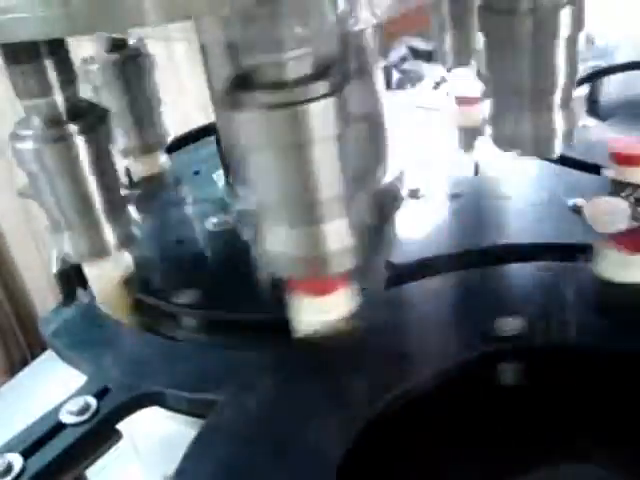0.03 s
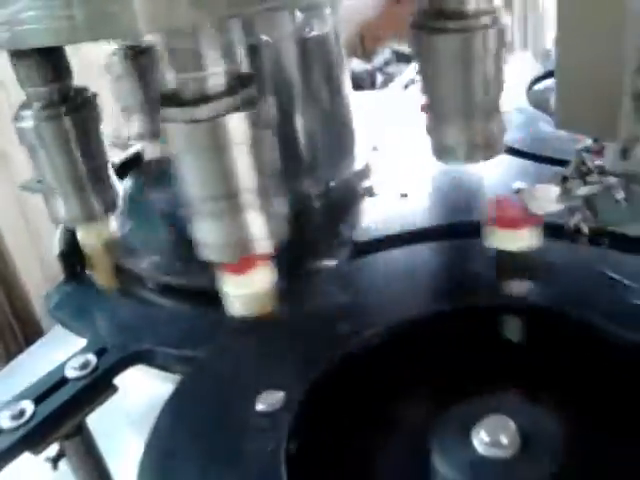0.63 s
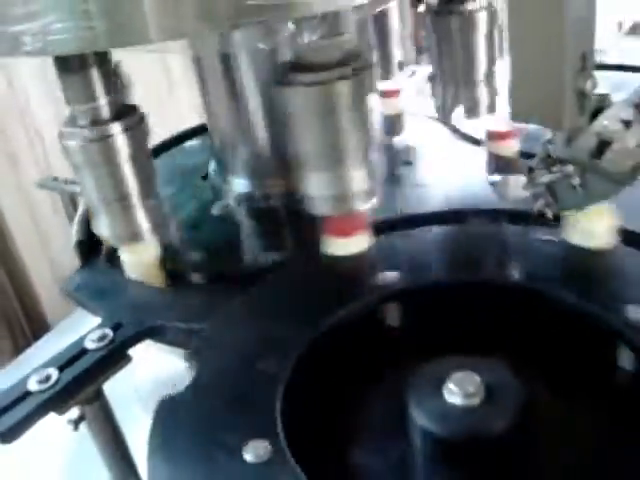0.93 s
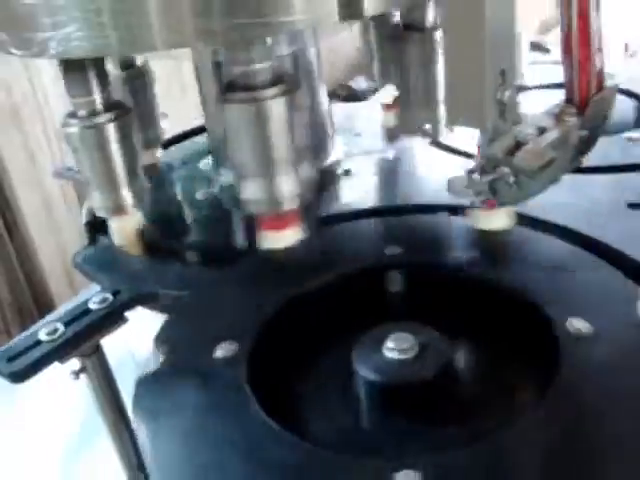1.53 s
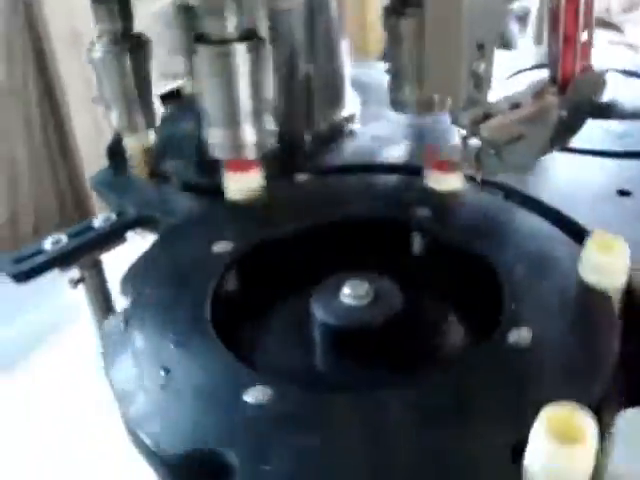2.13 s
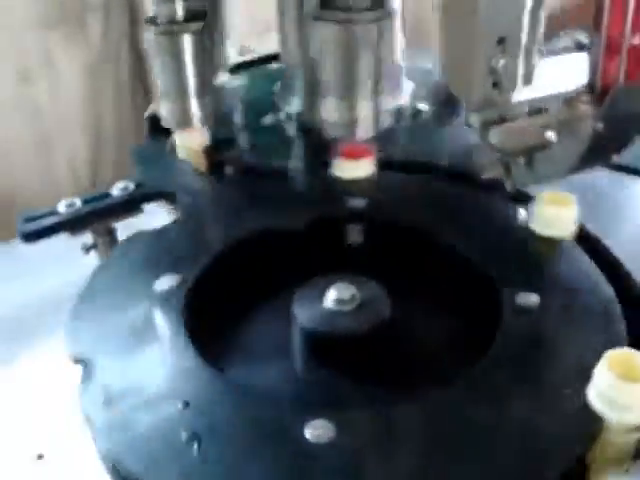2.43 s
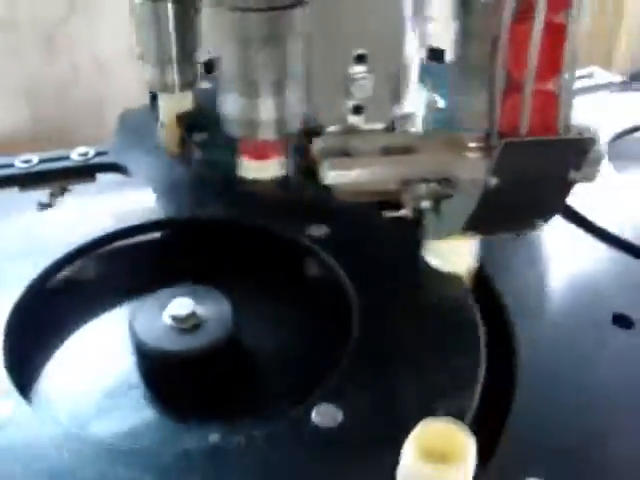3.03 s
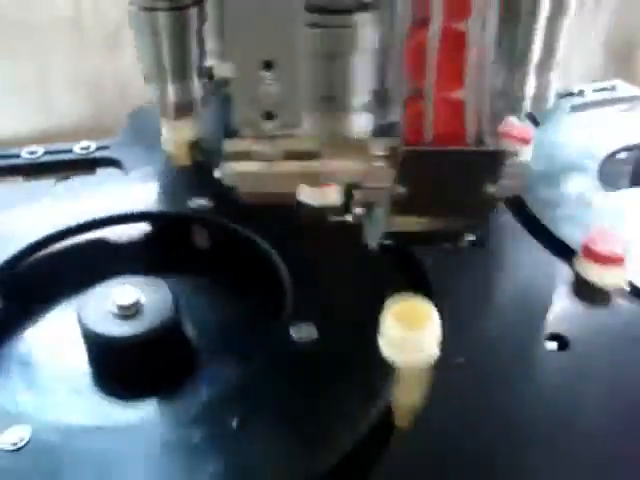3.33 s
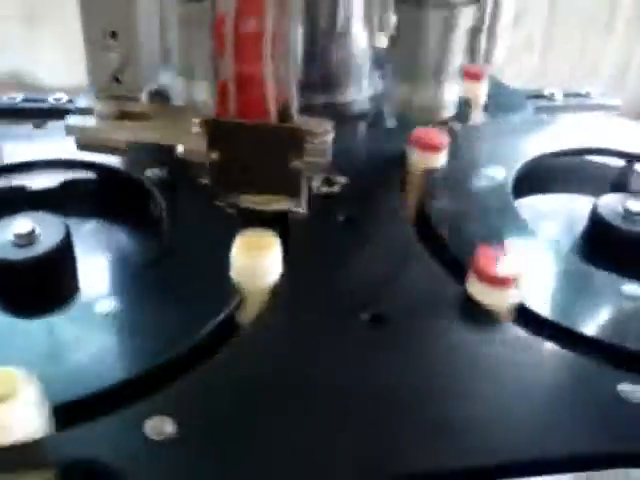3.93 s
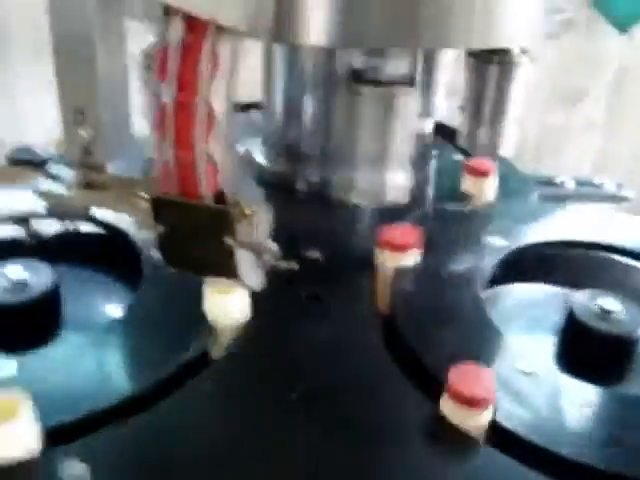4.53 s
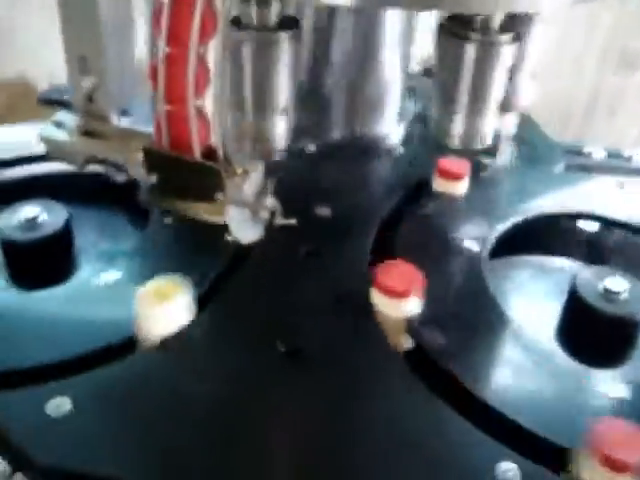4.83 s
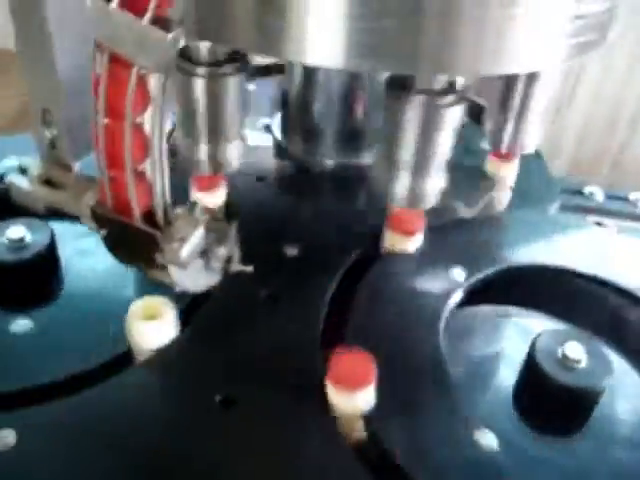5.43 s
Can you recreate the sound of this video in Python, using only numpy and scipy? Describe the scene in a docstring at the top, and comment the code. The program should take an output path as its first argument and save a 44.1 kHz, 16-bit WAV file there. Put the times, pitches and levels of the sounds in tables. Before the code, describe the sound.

A loud capping machine rattles and grinds steadily, pulsing with sharp, whistling air blasts twice a second and occasional steel clacks.

```python
"""An air valve blasts twice a second on a rotary capping machine: a turbulent jet that whistles in its nozzle.
Before each blast a head bears down and its chuck scrapes on a cap by stick-slip friction. Air spits,
bottles knock and steel clacks and squeals in between. Behind it all, caps rattle in a mains-driven feeder,
gears and star wheels grind and a motor hums. The gain control of a close mono camera ducks under every
blast and creeps back, so the whole din pulses."""
import sys
import numpy as np
from scipy import signal
from scipy.fft import rfft, irfft, next_fast_len
from scipy.io import wavfile
from scipy.ndimage import uniform_filter1d, map_coordinates

SR = 44100
rng = np.random.default_rng(int(sys.argv[2]) if len(sys.argv) > 2 else 0)


def persist_wave(psi):
    """Save psi, clipped to +-1, as 16-bit WAV."""
    counts = np.round(np.clip(psi, -1, 1) * 32767).astype(np.int16)
    wavfile.write(sys.argv[1], SR, np.atleast_2d(counts).T)


N = 250047

# one machine cycle a bottle, ended by its air blast: (time [s], hiss [dB], time held open [s],
# nozzle whistle [dB], opening crack [dB], scrape on the cap [dB], gear level in the next cycle [dB])
CYCLES = [(0.137, -15, 0.018, -19.5, -16, -23, -0.5), (0.647, -16, 0.032, -22, -20, -21.5, -0.9),
          (1.159, -13.5, 0.013, -20, -16.5, -21, -1), (1.665, -17.5, 0.039, -19, -17, -38, -0.5),
          (2.177, -14, .016, -25, -13.5, -28, -0.4), (2.691, -15, 0.02, -18.5, -14, -23, -0.9),
          (3.198, -18, .025, -21.5, -16.5, -24, -0.2), (3.718, -9.5, 0.016, -17, -10.5, -25, -1.5),
          (4.226, -10, 0.012, -25, -14.5, -31, -0.4), (4.733, -11, 0.023, -23, -14.5, -34, -0.1),
          (5.245, -15, 0.025, -22, -21, -24, -1)]
# steel clacks of the capping heads: (time [s], level [dB], shrill edge [dB])
CLACKS = [(.57, -17, -22), (1.11, -17, -22), (1.127, -12, -9), (1.618, -18, -22), (1.802, -16, -22),
          (2.145, -18.5, -21), (2.638, -10, 1), (3.925, -15.5, -20), (4.15, -12.5, -10),
          (5.171, -16.5, -22), (5.559, -13.5, -14)]
# spectrum of the shrill edge of blasts and clacks: (frequency [Hz], relative level [dB])
SHRILL_SPECTRUM = [(9000, -48), (11500, -5.5), (17000, 16), (21000, -20)]
# spectrum of the nozzle's resonance: (frequency [Hz], relative level [dB])
NOZZLE_SPECTRUM = [(4200, -42), (4800, -3.5), (5050, 2.5), (5300, -9), (5900, -40.5)]
CYCLE_S, FIRST_BLAST_S = 0.511, CYCLES[0][0]


def amp(db):
    """Amplitude ratio of a level in decibels."""
    return 10 ** (np.asarray(db) / 20)


def unit(x):
    """x scaled to rms 1."""
    return x / np.sqrt(np.mean(x ** 2) + 1e-20)


def clock():
    """The time of each sample in seconds."""
    return np.arange(N) / SR


def wobble(rate):
    """A smooth random curve, rate knots a second."""
    return map_coordinates(rng.standard_normal(int(N * rate / SR) + 4), [np.arange(N) * rate / SR])


def filtered(x, response):
    """Linear filtering: the spectrum of x times a frequency response."""
    size = next_fast_len(N + SR // 2)
    return irfft(rfft(x, size) * response(np.fft.rfftfreq(size, 1 / SR)), size)[:N]


def coloured(x, spectrum):
    """x shaped by (frequency [Hz], level [dB]) points on a log axis, at rms 1."""
    points_hz, db = np.transpose(spectrum)
    return unit(filtered(x, lambda hz: amp(np.interp(np.log(hz + 1), np.log(points_hz), db))))


def noise(spectrum):
    """Coloured Gaussian noise at rms 1."""
    return coloured(rng.standard_normal(N), spectrum)


def patchy(x, depth_db, size=4096):
    """Random modulation in patches of time and frequency, as parts turn."""
    bins = signal.stft(x, nperseg=size)[2]
    field = uniform_filter1d(rng.standard_normal(bins.shape), size=4, axis=0)
    field = uniform_filter1d(field, size=5, axis=1)
    return signal.istft(bins * amp(depth_db * unit(field)), nperseg=size)[1][:N]


def contacts(rate, spread_db):
    """Shot noise: random tiny impacts of uneven size, rate a second, at rms 1."""
    impulses = (rng.random(N) < rate / SR) * rng.choice([-1, 1], N)
    return unit(impulses * amp(spread_db * rng.standard_normal(N)))


def burst(start, attack, hold, t60):
    """An envelope that rises, holds and decays exponentially; times in seconds."""
    age = np.maximum(clock() - start, 0)
    return (1 - np.exp(-age / attack)) * amp(-60 * np.clip((age - hold) / t60, 0, 2))


def pressing(lead_s=0.25):
    """The load of a head on its cap, 0 to 1: it builds up before each blast and lets go."""
    to_blast = (FIRST_BLAST_S - clock()) % CYCLE_S
    return uniform_filter1d(np.clip(2 * (1 - to_blast / lead_s), 0, 1), size=441)


def motor():
    """Mains hum: harmonics of the supply waver slightly in level and phase."""
    # hum partials: (frequency [Hz], peak level [dB])
    partials = [(149.7, -59.5), (199.6, -51.5), (349.4, -44), (499.2, -41)]
    return sum(amp(db + 0.92 * wobble(4)) * np.sin(2 * np.pi * hz * clock() + 0.5 * wobble(2.89))
               for hz, db in partials)


def gears():
    """Contact noise: gears and star wheels grind over a faint, lumpy rumble, louder under load."""
    # spectra of the grinding and the rumble: (frequency [Hz], relative level [dB])
    grind_spectrum = [(70, -39.5), (160, -18), (205, -5.5), (310, -5), (540, 1.5), (850, 3), (1400, 0.5),
                      (2200, -2.5), (5000, -31)]
    rumble_spectrum = [(20, -8), (50, -9.5), (100, 4.5), (160, 1.5), (300, -30)]
    teeth = patchy(contacts(rate=1400, spread_db=3.5) + rng.standard_normal(N), depth_db=1.9)
    rumble = amp(-39 + 4 * wobble(14)) * noise(rumble_spectrum)
    grind = amp(0.52 * wobble(14)) * coloured(teeth, grind_spectrum)
    drag_db = sum(db * ((clock() > s) & (clock() <= s + CYCLE_S)) for s, *_, db in CYCLES)
    return amp(-24.5 + drag_db + 1.17 * pressing()) * (grind + rumble)


def feeder(mains_hz=49.9, shake_db=1.5, settle_s=0.16):
    """Forced vibration: caps thrown up once per mains cycle chatter and excite the steel chute's modes."""
    # spectrum of the chatter: (frequency [Hz], relative level [dB])
    rattle_spectrum = [(100, -53.5), (300, -31.5), (1000, -6), (1500, -6), (1800, 0.5), (2250, -0.5),
                       (3150, 0.5), (3500, -1), (4700, -2.5), (6000, -8), (7400, -12), (8400, -17),
                       (9300, -16), (10000, -30)]
    # resonances of the steel: (frequency [Hz], bandwidth [Hz], relative level [dB])
    modes = [(1784, 136, -2), (2643, 160, 3.5), (2800, 170, 4), (4700, 100, -30.5)]
    # the camera drifts towards the chute and past it:
    # (time [s], change of the rattle [dB], ringing relative to the rattle [dB])
    nearness = [(0, -0.6, -7), (.7, -0.9, -7.5), (1.4, -1.8, -6.5), (2.2, -0.34, -7), (3.15, 0, -5.5),
                (3.9, 0.4, -5.5), (4.45, -0.5, -3.5), (5.1, -0.3, -5), (5.67, 0.4, -7.5)]

    def steel(hz):
        """Frequency response of damped resonators in parallel."""
        return sum(amp(db) * 1j * hz * width / (centre ** 2 - hz ** 2 + 1j * hz * width)
                   for centre, width, db in modes)

    phase = 2 * np.pi * mains_hz * clock()
    throw = amp(0.9 * np.sin(phase) + 0.5 * np.sin(2 * phase))  # the second harmonic is the rebound
    impacts = throw * contacts(rate=4000, spread_db=3.1)
    hall_wash = 0.87 * rng.standard_normal(N)
    chatter = coloured(patchy(impacts + hall_wash, depth_db=1.92), rattle_spectrum)
    ring = filtered(throw * contacts(rate=3000, spread_db=2.5), steel)
    ring = unit(patchy(ring, depth_db=0.8))
    times, near_db, chute_db = np.transpose(nearness)
    since_blast = (clock() - FIRST_BLAST_S) % CYCLE_S
    stir_db = shake_db * np.exp(-since_blast / settle_s)  # each blast stirs the caps
    level_db = -18 + np.interp(clock(), times, near_db) + stir_db
    ring_db = np.interp(clock(), times, chute_db) + pressing()  # a pressing head shakes the chute
    return amp(level_db) * (chatter + amp(ring_db) * ring)


def thuds(transfer_db=-37):
    """Reaction force: the heavy frame takes a push from every blast and clack, and hardly rings."""
    push = sum(amp(db + transfer_db) * burst(s - 0.004, attack=0.002, hold=0.0067, t60=0.06)
               for s, db, *_ in [*CYCLES, *CLACKS])
    return push * noise([(20, -4), (60, -2), (130, 5), (250, -8), (800, -51)])


def squeals():
    """Friction-excited vibration: rubbing steel sings for a moment on one wavering mode."""
    # thin squeals: (time [s], relative level [dB], duration [s], frequency [Hz])
    rubs = [(0.563, -25, .03, 4600), (.72, -35, 0.071, 4580), (4.422, -24, 0.11, 2885),
            (4.62, -35, .1, 2700), (5.305, -21, .025, 4640)]
    out = np.zeros(N)
    for s, db, length, hz in rubs:
        tone = np.sin(2 * np.pi * hz * clock() + 0.64 * wobble(76))
        out += amp(db + 2.5) * burst(s, attack=0.02, hold=length, t60=0.15) * tone
    return out


def knocks():
    """Modal ringing: a plastic bottle knocked in the star wheels sounds three close, damped modes."""
    # hollow knocks: (time [s], level of each mode [dB], pitch [Hz])
    blows = [(0.94, -22, 900), (1.462, -19, 846), (1.968, -18.5, 790), (2.977, -15, 1188),
             (3.488, -19, 1094), (3.777, -20, 802), (4.007, -20, 1150), (5.018, -20, 1008),
             (5.176, -17, 820)]
    out = np.zeros(N)
    for s, db, hz in blows:
        ring = sum(np.sin(2 * np.pi * (hz * ratio * clock() + rng.random())) for ratio in (0.8, 1, 1.22))
        out += amp(db) * burst(s, attack=0.00068, hold=0.0034, t60=0.043) * ring
    return filtered(out, lambda hz: hz ** 2 / (hz ** 2 + 300 ** 2))  # too small to radiate bass


def clacks():
    """Damped impact: steel parts of a head collide in a broadband burst with a shrill edge."""
    # spectrum of the impact: (frequency [Hz], relative level [dB])
    body_spectrum = [(150, -38), (600, -6), (1800, 4.5), (3000, 4.5), (4200, 2.5), (5200, -7), (7000, -3.5),
                     (10000, -9.5)]
    body = sum(amp(db) * burst(s, attack=0.00066, hold=0.0033, t60=0.047) for s, db, _ in CLACKS)
    edge = sum(amp(db) * burst(s + 0.003, attack=0.001, hold=0.004, t60=0.04) for s, _, db in CLACKS)
    return body * noise(body_spectrum) + edge * noise(SHRILL_SPECTRUM)


def scrapes(lead_s=0.13):
    """Stick-slip friction: before each blast the spinning chuck slips on the cap in tiny catches."""
    # spectrum of the scrape: (frequency [Hz], relative level [dB])
    scrape_spectrum = [(1200, -29), (2600, -8.5), (3000, 7.5), (3350, -2), (3900, -1.5), (4700, -6),
                       (8000, -23)]
    pressure = sum(amp(db) * burst(s - lead_s, attack=0.034, hold=0.11, t60=0.071)
                   for s, *_, db, _ in CYCLES)
    return pressure * coloured(contacts(rate=5000, spread_db=3), scrape_spectrum)


def spits():
    """Flow-excited tones: air escapes briefly through a narrow gap, two rough whistles over a hiss."""
    # spits of air: (time [s], relative level [dB], whistle frequency [Hz], relative nozzle level [dB])
    escapes = [(0.111, -29, 9200, -29), (0.272, -21, 9100, -39), (.423, -31, 9250, -34),
               (0.777, -27.5, 9200, -22), (1.305, -28, 9100, -19), (2.322, -29.5, 9360, -20.5),
               (2.643, -19.5, 9370, -20), (3.339, -30.5, 9400, -33), (3.779, -26, 9000, -32),
               (3.842, -23, 9300, -21), (3.998, -30, 9100, -24), (4.366, -23.5, 9170, -20),
               (4.856, -29.5, 9200, -22), (5.311, -26.5, 9150, -30)]
    # spectrum of their hiss: (frequency [Hz], relative level [dB])
    hiss_spectrum = [(1500, -20.5), (4000, -15), (6000, 3), (8000, -3), (10000, -8)]
    out, hiss, nozzle = np.zeros(N), noise(hiss_spectrum), noise(NOZZLE_SPECTRUM)
    for s, db, hz, nozzle_db in escapes:
        whistle = np.sin(2 * np.pi * hz * clock() + 1.5 * wobble(550))
        air = amp(db) * (amp(3) * whistle + amp(0.5) * hiss) + amp(nozzle_db - 0.5) * nozzle
        out += burst(s, attack=0.0004, hold=0.013, t60=0.013) * air
    return out


def plunger(lag_s=0.019):
    """Impact transient: the valve's plunger hits its stop with a dry click just after each opening."""
    # spectrum of the click: (frequency [Hz], relative level [dB])
    click_spectrum = [(900, -33), (1600, -3), (2050, 3), (2500, -4.5), (3500, -23)]
    landings = sum(burst(s + lag_s, attack=0.001, hold=0.004, t60=0.02) for s, *_ in CYCLES)
    return amp(-17) * landings * noise(click_spectrum)


def valve():
    """Turbulent jet noise: each blast cracks open at full pressure, then hisses and whistles."""
    # spectrum of the jet: (frequency [Hz], relative level [dB])
    jet_spectrum = [(800, -33), (2100, 2.5), (3500, 2.5), (4400, 3.5), (4700, 0), (5650, 3.5), (6250, 2),
                    (6700, -2), (8800, -5), (9800, -5.5)]
    flow, whistle, crack = np.zeros((3, N))
    for s, hiss_db, hold, whistle_db, crack_db, *_ in CYCLES:
        flow += amp(hiss_db) * burst(s, attack=0.0018, hold=hold, t60=0.26)
        whistle += amp(whistle_db) * burst(s, attack=0.001, hold=hold, t60=0.32)
        crack += amp(crack_db) * burst(s, attack=0.00032, hold=0.0025, t60=0.01)
    jet = (flow + amp(5.5) * crack) * noise(jet_spectrum)
    nozzle = whistle * noise(NOZZLE_SPECTRUM)
    edge = (amp(3.5) * flow + amp(18.5) * crack) * noise(SHRILL_SPECTRUM)
    return jet + nozzle + edge


def scene():
    """Superposition: the steady din and the sounds of each cycle add at one microphone."""
    mono = gears() + feeder() + motor() + scrapes() + squeals()
    mono += valve() + spits() + knocks() + clacks() + thuds() + plunger()
    return np.array([mono, mono])


def gain_control(x, threshold_db, slow_share, quick_share):
    """Compression: level over the threshold cuts the gain at once; it returns in two stages."""
    power = np.abs(uniform_filter1d(x[0] ** 2, size=88))
    excess_db = np.maximum(10 * np.log10(power + 1e-12) - threshold_db, 0)

    def held(fall_db_per_s):
        """Peak detection: the excess level, falling steadily from each peak."""
        fall_db = fall_db_per_s * clock()
        return np.maximum.accumulate(excess_db + fall_db) - fall_db

    return x * amp(-slow_share * held(34.5) - quick_share * held(1509))


def record(dry, ceiling=0.8, cutoff_hz=10120):
    """Full-band compression and soft clipping of stray peaks, then a steep low-pass filter."""
    ducked = gain_control(dry, threshold_db=-10, slow_share=0.29, quick_share=0.57)
    rounded = ducked / (1 + (ducked / ceiling) ** 6) ** (1 / 6)
    treble_cut = lambda hz: amp(-np.clip((hz - cutoff_hz) / 5, 0, 100))
    return np.array([filtered(channel, treble_cut) for channel in rounded])


dry = scene()
out = record(dry)
persist_wave(out)
```